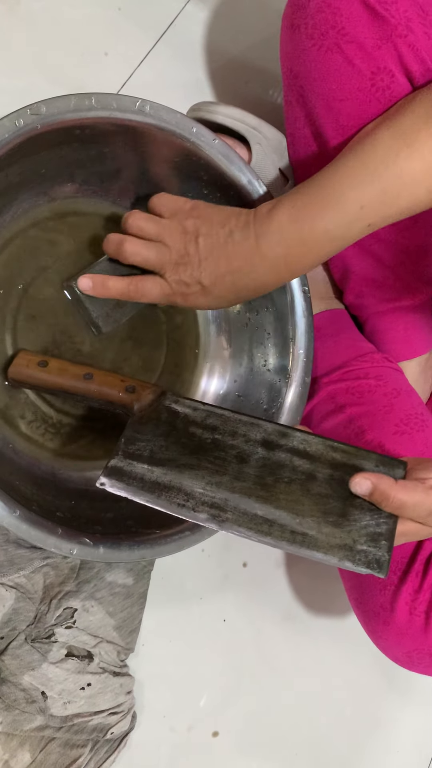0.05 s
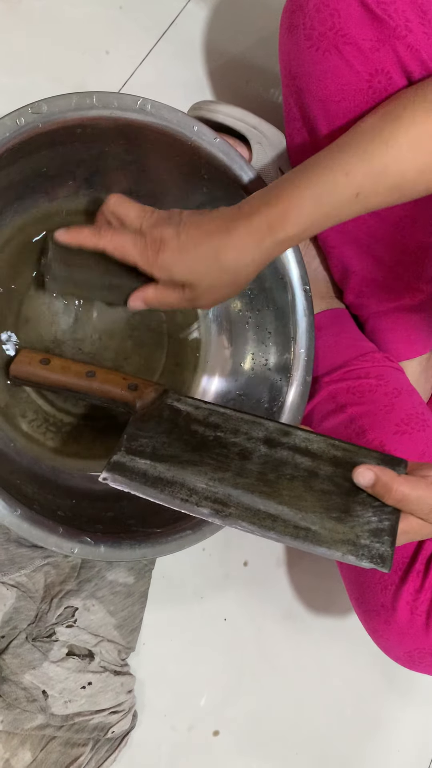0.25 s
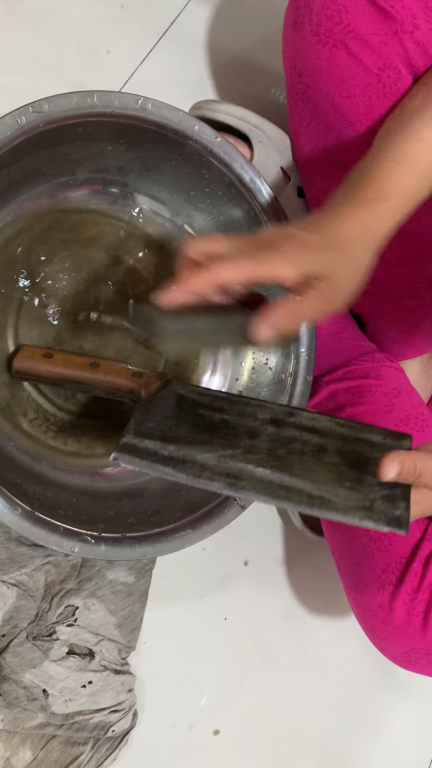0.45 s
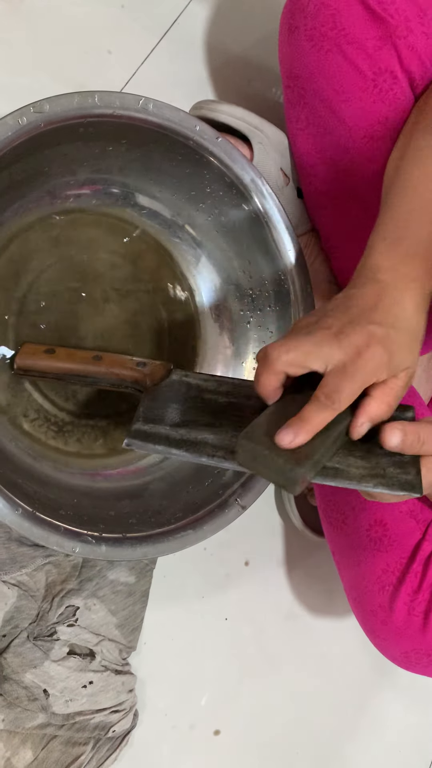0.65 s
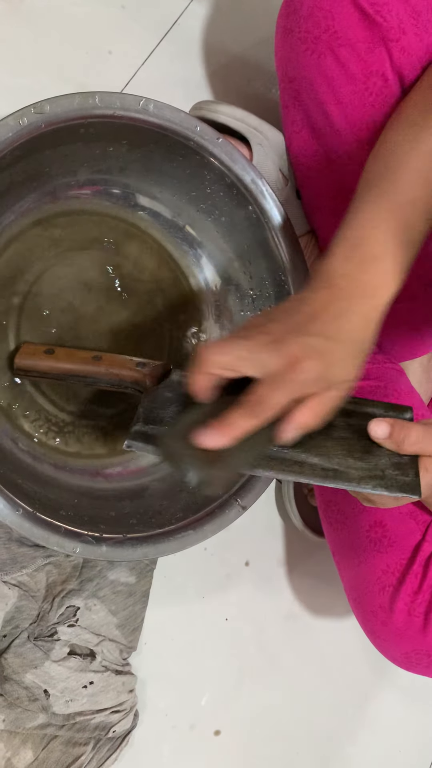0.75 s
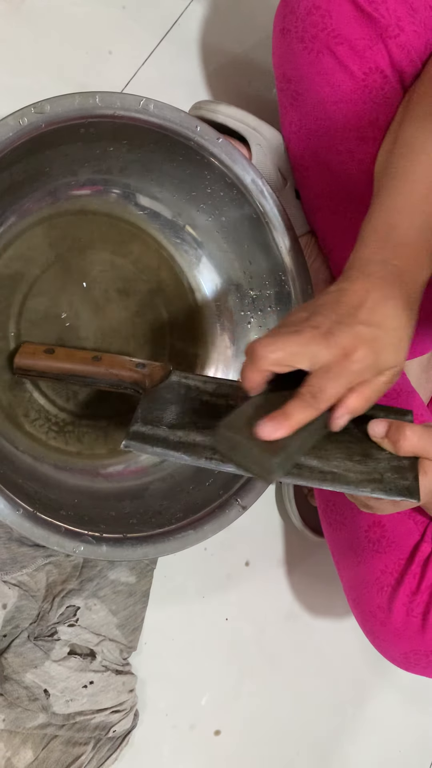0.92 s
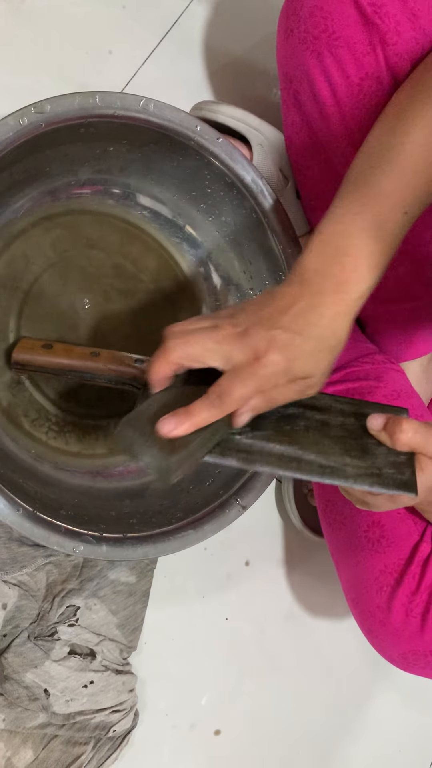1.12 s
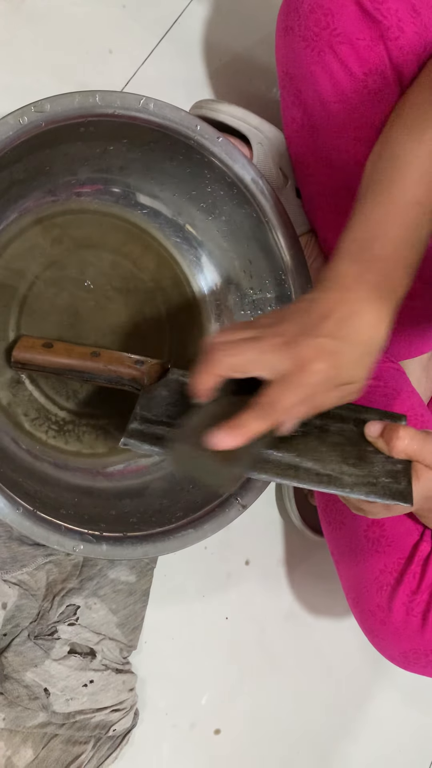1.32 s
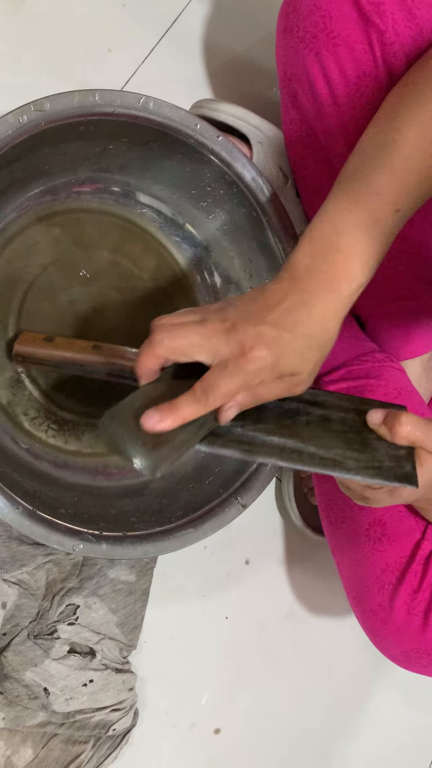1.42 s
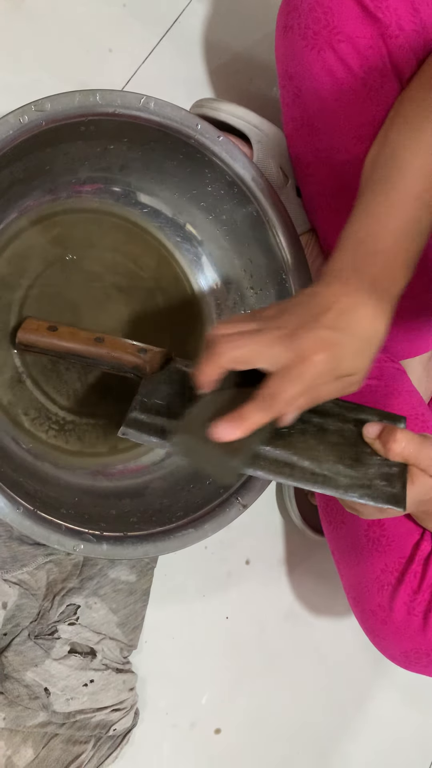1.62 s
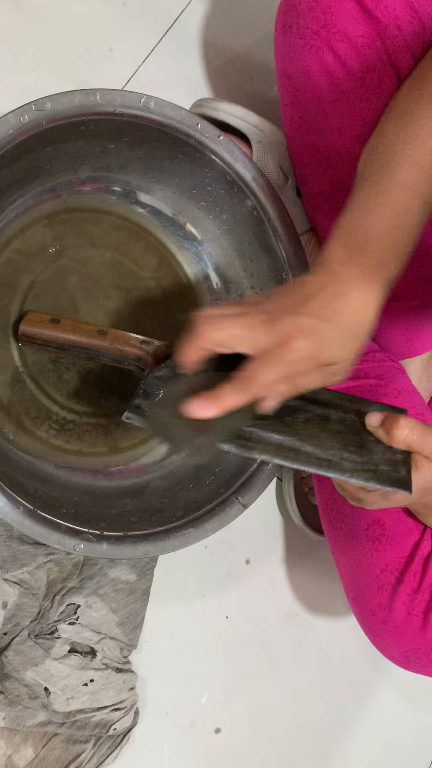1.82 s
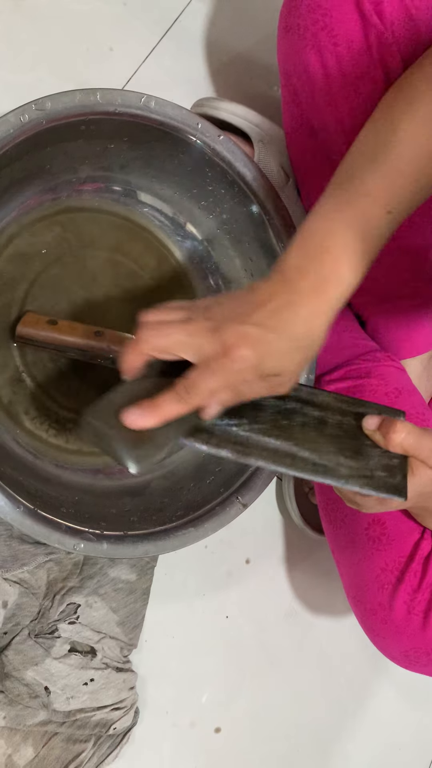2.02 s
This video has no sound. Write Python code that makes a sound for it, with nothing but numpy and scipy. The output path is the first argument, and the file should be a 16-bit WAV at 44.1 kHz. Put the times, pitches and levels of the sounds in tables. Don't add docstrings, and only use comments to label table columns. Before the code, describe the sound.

A whetstone rubs a steel cleaver: a fading metal ring, light bumps and scrape in a metal basin, small drips, a loud crack on the blade, then rapid gritty strokes, close phone microphone in a small tiled room.

```python
import sys
import numpy as np
from scipy import signal
from scipy.fft import rfft, irfft, next_fast_len
from scipy.io import wavfile
from scipy.ndimage import uniform_filter1d

SR = 44100
rng = np.random.default_rng(int(sys.argv[2]) if len(sys.argv) > 2 else 0)


def ratio_of_db(decibels):
    return 10 ** (np.asarray(decibels, float) / 20)


def file_out(sig):
    cols = np.atleast_2d(sig).T
    lim = np.clip(cols, -1, 1)
    pcm = np.round(lim * 32767).astype(np.int16)
    wavfile.write(sys.argv[1], SR, pcm)


N = 90846
T = np.arange(N) / SR

# (frequency [Hz], level [dB])
HOUSE_COLOUR = [(30, -4), (75, 9.5), (130, -3), (280, -11), (1000, -5.5), (1900, -12), (5000, -21),
                (9000, -33.5)]
# (frequency [Hz], level [dB], T60 [s])
HOLLOW_MODES = [(372, 3.5, 0.096), (794.4, 8.5, 0.69), (1196, 5.5, 0.063), (1610, 6, 0.65),
                (1750, -20, .15)]
# (frequency [Hz], level [dB], T60 [s])
EARLY_MODES = [(407, -11, 0.67), (787, 1.5, 1), (1300, -19, 0.28), (1507, 6, 0.36), (1900, -18, 0.35),
               (1962, 12.5, 0.4), (2920, -4, 0.3), (6900, -6.5, 0.7)]
# (time [s], level [dB])
DRAG_LEVELS = [
    (0.139, -60),
    (0.148, -37),
    (.176, -34.5),
    (0.234, -30.5),
    (0.261, -39.5),
    (0.309, -42.5),
    (0.347, -38.5),
    (.37, -48),
    (.45, -73),
]
# (frequency [Hz], level [dB])
DRAG_COLOUR = [(300, -51), (900, -24), (1600, -4), (2700, 5), (4500, 3), (7000, 2), (9000, -2.5),
               (16000, -8.5)]
# (time [s], level [dB], rattle [s], centre [Hz], width [octaves])
BUMPS = [
    (.1462, -28.5, 0.0031, 830, 0.64),
    (.15, -32, 0.0047, 7100, 0.48),
    (.152, -44, 0.0029, 840, 0.89),
    (.156, -36, 0.0052, 536, 1.2),
    (.212, -33, 0.0054, 3260, 0.23),
    (.228, -26, 0.0059, 4750, .3),
    (.2405, -38, 0.0045, 495, 0.7),
    (.293, -43.5, 0.0099, 640, 2.9),
    (.345, -43, 0.013, 2400, 2),
]
# (frequency [Hz], level [dB], T60 [s])
BASIN_MODES = [(368.4, -15, 0.22), (458, -17, 0.095), (554, -8.5, 0.062), (788.5, -15, 0.11),
               (1157, -8, 0.08), (2000, -11, 0.27), (2220, -4.5, 0.22), (3380, -9.5, 0.091),
               (3640, -22, 0.23), (6420, -12, 0.11)]
# (time [s], level [dB], pitch [Hz])
DROPS = [
    (0.386, -49.5, 820),
    (0.402, -47, 1173),
    (0.421, -48.5, 1278),
    (0.442, -45.5, 933),
    (0.454, -43, 1090),
    (0.469, -47.5, 872),
    (0.491, -49.5, 1527),
    (.53, -66, 945),
]
# (time [s], level [dB], rattle [s], centre [Hz], width [octaves])
KNOCKS = [(.690, -32, 0.005, 2900, 1.1), (.6948, -15, 0.012, 10300, 1), (.6955, -17.5, 0.02, 2720, 1.45),
          (.696, -32.5, 0.0089, 516, 1.64), (.6985, -19.5, 0.0058, 10100, 0.12),
          (.6975, -11, 0.0019, 2020, 0.31), (.698, -15.5, 0.0053, 9200, 0.87),
          (.7003, -9, 0.0017, 3170, 1.24), (.7025, -16.5, 0.0019, 1730, 0.54),
          (.7078, -8, 0.0044, 6500, 1.6), (.709, -8, 0.002, 4130, 0.81), (.7117, -12, 0.0029, 2100, 0.41),
          (.7235, -22.5, .003, 6060, 0.41), (.728, -28, 0.0033, 4200, 0.35), (.741, -30, 0.007, 2900, 0.38),
          (.984, -35, 0.0034, 2080, 1.07), (.995, -36, 0.0026, 2000, 0.96), (1.039, -35, .005, 1900, .2),
          (1.066, -38, 0.006, 2250, 0.3), (1.074, -37, .003, 2850, .3), (1.2938, -35, 0.004, 1100, 2.5),
          (1.2938, -27, 0.004, 2200, 0.4), (1.2995, -29, .004, 1950, .3), (1.306, -33, .005, 2000, .4),
          (1.6152, -33, 0.0019, 900, 3), (1.618, -33, 0.003, 3000, 1.5),
          (1.6208, -27.5, 0.0021, 2100, 0.28), (1.633, -35, 0.0018, 2000, 0.36),
          (1.638, -51, 0.0044, 1845, .4), (1.858, -31.5, 0.0033, 2090, 0.34),
          (1.87, -22.5, 0.0028, 7140, 0.5), (1.889, -25.5, 0.0067, 6140, 1.3),
          (1.898, -23, .003, 7060, 0.48), (1.923, -30.5, 0.0082, 4500, 1.2),
          (1.9255, -29, 0.0024, 1990, 0.54), (1.9347, -22, 0.0035, 8550, 1.06),
          (1.941, -37, 0.003, 1340, 1.9)]
# (frequency [Hz], level [dB], T60 [s])
BLADE_MODES = [(1335, -16.5, 0.27), (1598, -7.5, 0.17), (2000, -7.5, 0.11), (2260, -11.5, 0.25),
               (2900, -3, 0.4), (3268, -5, 0.32), (3700, -16, 0.65), (3840, -13, 0.52), (4320, -27, 0.24),
               (5430, -6.5, 0.13), (5940, -11.5, 0.11), (6100, -14, 0.093), (7430, -10, 0.2),
               (9870, -15, 0.2)]
# (start [s], length [s], level [dB],
# lean [over 1 = fastest late], roundness [small = flat top])
STROKES = [
    (.72, .17, -40.5, 5.6, 0.079),
    (0.875, 0.15, -32.5, 1.61, 0.5),
    (1.032, 0.16, -32, 0.82, 0.81),
    (1.191, 0.15, -33, 1.12, 0.72),
    (1.344, 0.15, -34.5, 1.55, 0.08),
    (1.507, 0.15, -30, 0.78, 0.95),
    (1.651, 0.17, -33.5, 1.18, 0.36),
    (1.834, 0.14, -30, 0.54, 0.7),
    (1.982, 0.2, -31.5, 1.06, 0.46),
]
# (frequency [Hz], level [dB])
GRIT_COLOUR = [(300, -32.5), (1300, -13.5), (1950, 4.5), (2550, 0), (3400, -2), (6500, 1.5), (11000, -2),
               (16000, -8)]
# (frequency [Hz], phase [rad], share of scattered sound [0-1])
STEREO_DIFFERENCE = [(0, 0.2, .1), (130, 1.2, .15), (330, 0.0, .2), (560, 0.2, .6), (900, 2.1, .4),
                     (1300, 1.4, .25), (1950, 2.85, .03), (2300, 2.9, .04), (2850, 3.2, .06), (3550, 4.5, .3),
                     (4150, 4.0, .2), (4600, 3.2, .01), (5000, 3.0, .02), (6700, 0, .06), (8800, -3.14, .02),
                     (10900, -6.28, .08), (13100, -9.42, .02), (15000, -12.56, .06)]


def colour(x, table):
    hz, db = np.array(table, float).T
    log_hz = np.log(np.arange(1025) * SR / 2048 + 1)
    cepstrum = irfft(np.interp(log_hz, np.log(hz), db) * np.log(10) / 20)
    cepstrum[1:1024] *= 2
    cepstrum[1025:] = 0
    impulse = irfft(np.exp(rfft(cepstrum)))
    return signal.fftconvolve(x, impulse)[:N]


def level(x, db):
    return x * ratio_of_db(db) / np.sqrt(np.mean(x ** 2))


def walk(rate):
    hold = int(SR / rate)
    targets = rng.standard_normal(N // 64)[:N // hold + 1]
    return uniform_filter1d(np.repeat(targets, hold)[:N], hold)


def bandpass(x, low_hz, high_hz):
    return signal.sosfilt(signal.butter(2, [low_hz, high_hz], "band", fs=SR, output="sos"), x)


def ring(x, modes, spread_db, damp):
    out = 0
    for hz, db, t60 in modes:
        pole = np.exp(2j * np.pi * hz / SR - np.log(1000) / (t60 * damp * SR))
        drive = x * ratio_of_db(spread_db * walk(40))
        gain = ratio_of_db(db) * np.sqrt(1 - abs(pole) ** 2)
        out = out + gain * signal.lfilter([1], [1, -pole], drive).imag
    return out


def grit(rough_db, shared_db, own_db, centre_hz, peak_db, dull):
    grain_db = rough_db * rng.exponential(size=N)
    flicker_db = shared_db * (walk(120) + walk(34.89))
    clicks = rng.standard_normal(N) * ratio_of_db(grain_db + flicker_db)
    out = 0
    edges = 150 * 2 ** np.arange(0, 7.1, 1 / 3)
    for low, high in zip(edges, edges[1:]):
        peak = peak_db * np.exp(-(np.log2(low / centre_hz) / 0.5) ** 2)
        treble_loss = dull * max(np.log2(low / 3000), 0)
        db = own_db * walk(70) + peak - treble_loss
        out = out + bandpass(clicks, low, high) * ratio_of_db(db)
    return level(out, 0)


def blows(rows, rough_db):
    out = np.zeros(N + SR)
    t = np.arange(2000) / SR
    for start, db, rattle, hz, width in rows:
        grains = rng.standard_normal(len(t)) * ratio_of_db(rough_db * rng.exponential(size=len(t)))
        x = grains * np.exp(-(t / rattle) ** 2)
        x[0] = 4.5 * np.sqrt(rattle * SR) / 4
        half_band = 2 ** (width / 2)
        x = bandpass(x, hz / half_band, min(hz * half_band, 19000))
        i = int(start * SR)
        out[i:i + len(t)] += ratio_of_db(db) * x / np.sqrt(np.sum(x ** 2) / (rattle * SR))
    return out[:N]


def house():
    air = level(colour(rng.standard_normal(N), HOUSE_COLOUR), -55) * ratio_of_db(0.8 * walk(9.8))
    hum_hz = 76.3 * (1 + 0.0548 * walk(8.48))
    hum = np.sin(2 * np.pi * np.cumsum(hum_hz) / SR) * ratio_of_db(-62.5 + 1.0 * walk(31.0))
    hollow = level(ring(rng.standard_normal(N), HOLLOW_MODES, spread_db=2.5, damp=0.7), -61)
    return air + hum + hollow


def duck():
    start_s, depth_db, recovery_s = 0.74, -7, 0.3
    return ratio_of_db(depth_db * (T > start_s) * np.exp(-((T - start_s) / recovery_s) ** 2))


def earlier_blow():
    early = ring(1.0 * (T == 0), EARLY_MODES, spread_db=0, damp=1)
    swish = colour(rng.standard_normal(N) * np.exp(-T / 0.044), DRAG_COLOUR)
    return ratio_of_db(-23.0) * early + ratio_of_db(-47.5) * swish


def drips():
    out = np.zeros(N)
    for start, db, hz in DROPS:
        t = np.maximum(T - start, 0)
        tone = np.sin(2 * np.pi * hz * t * (1 + 3.67 * t))
        out = out + ratio_of_db(db) * tone * np.exp(-t / 0.016) * np.minimum(t / 0.002, 1)
    return out


def basin():
    time, db = np.array(DRAG_LEVELS).T
    push = ratio_of_db(np.interp(T, time, db, left=-120, right=-120))
    rub = grit(rough_db=0.0, shared_db=-0.24, own_db=2.5, centre_hz=5740, peak_db=1.0, dull=0.085)
    bumps = blows(BUMPS, rough_db=2.5)
    scrape = level(colour(rub, DRAG_COLOUR), 0) * push
    drive = ratio_of_db(-10.5) * bumps + ratio_of_db(-7.0) * rub * push
    return scrape + ring(drive, BASIN_MODES, spread_db=6, damp=0.85) + bumps


def rim_hum():
    start_s, end_s = 0.82, 1.06
    swell = np.sin(np.pi * np.clip((T - start_s) / (end_s - start_s), 0, 1) ** 1.6)
    return ratio_of_db(-56) * np.sin(2 * np.pi * 385 * T) * swell


def knocks():
    crack = blows(KNOCKS, rough_db=2.0)
    choked = ring(crack, BLADE_MODES, spread_db=2, damp=0.11)
    long = ring(crack, BLADE_MODES, spread_db=2, damp=1.1)
    return crack + ratio_of_db(-9) * choked + ratio_of_db(-22) * long


def strokes():
    push, speed = np.zeros(N), np.zeros(N)
    for start, length, db, lean, roundness in STROKES:
        u = np.clip((T - start) / length, 0, 1)
        arch = np.abs(np.sin(np.pi * u ** lean))
        resting = ratio_of_db(-23) * (u > 0) * (u < 1)
        speed += arch
        push += ratio_of_db(db) * (arch ** roundness + resting)
    speed = np.minimum(speed, 1)
    peak_hz = 4500 * 2 ** (0.64 * speed)
    rub = grit(rough_db=1.2, shared_db=1.6, own_db=1.2, centre_hz=peak_hz, peak_db=1, dull=5.5 * (1 - speed))
    hiss = level(colour(rub, GRIT_COLOUR), 0)
    sing = level(ring(rub, BLADE_MODES, spread_db=9, damp=0.37), -17.5)
    return hiss * push + sing * push ** 0.71


def room_tail(t60, top_hz):
    t = np.arange(SR // 2) / SR
    lowpass = signal.butter(1, top_hz, fs=SR, output="sos")
    x = signal.sosfilt(lowpass, rng.standard_normal(len(t))) * ratio_of_db(-60 * t / t60)
    return x / np.sqrt(np.sum(x ** 2))


def widen(x, scatter):
    cells = signal.stft(x, nperseg=512)[2]
    random_phase = np.exp(2j * np.pi * rng.random(cells.shape))
    scattered = 1.4 * signal.istft(cells * random_phase, nperseg=512)[1][:N]
    hz, phase, share = np.array(STEREO_DIFFERENCE).T
    size = next_fast_len(N + SR // 4)
    f = np.arange(size // 2 + 1) * SR / size
    turn = np.exp(0.5j * np.interp(f, hz, phase))
    mix = np.clip(np.interp(f, hz, share) + scatter * np.minimum(f / 1500, 1), 0, 1) / 2
    direct = rfft(x, size) * np.sqrt(1 - mix)
    side = rfft(scattered, size) * np.sqrt(mix)
    left = irfft((direct + side) / turn, size)[:N]
    right = irfft((direct - side) * turn, size)[:N]
    return np.array([left, right])


def scene():
    background = widen(house() * duck(), scatter=1)
    near = earlier_blow() + drips() + basin() + rim_hum() + knocks() + strokes()
    room = ratio_of_db(-14) * signal.fftconvolve(near, room_tail(t60=0.4, top_hz=4740))[:N]
    return background + widen(near + room, scatter=0)


def top_cut(x):
    return signal.sosfilt(signal.butter(12, 16790, fs=SR, output="sos"), x)


def record(dry):
    limited = np.tanh(dry * 1.06) / 1.249
    x = signal.sosfilt(signal.butter(2, 45, "high", fs=SR, output="sos"), limited)
    x = signal.sosfilt(signal.ellip(10, 0.2, 55, 15850, fs=SR, output="sos"), x)
    return top_cut(x)


dry = scene()
out = record(dry)
file_out(out)
```